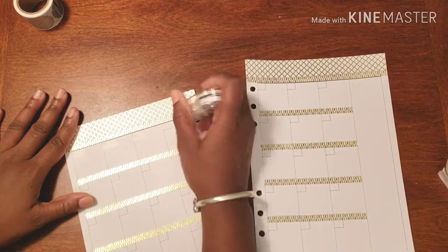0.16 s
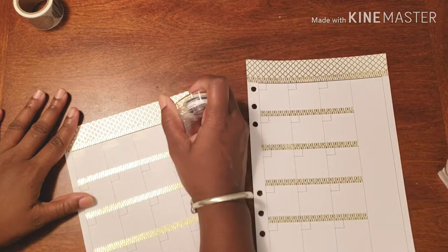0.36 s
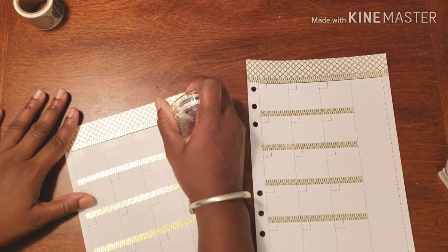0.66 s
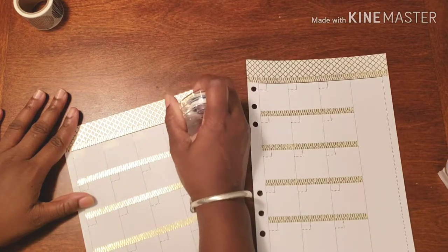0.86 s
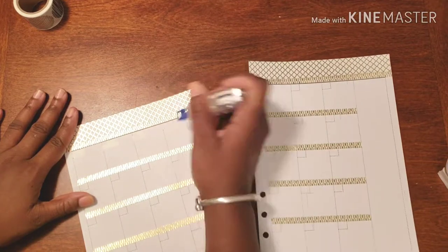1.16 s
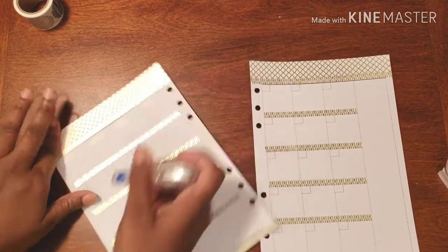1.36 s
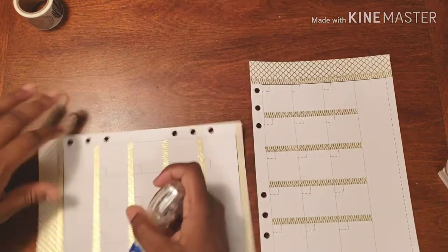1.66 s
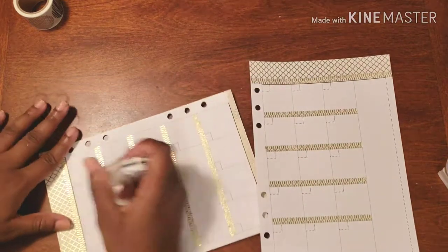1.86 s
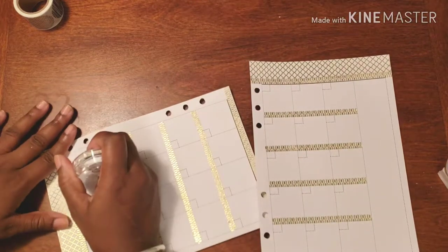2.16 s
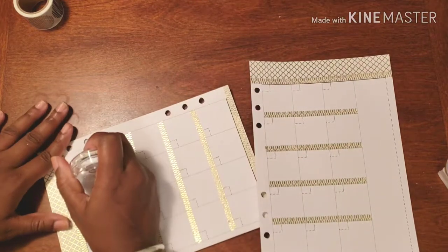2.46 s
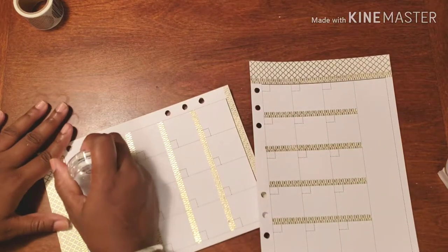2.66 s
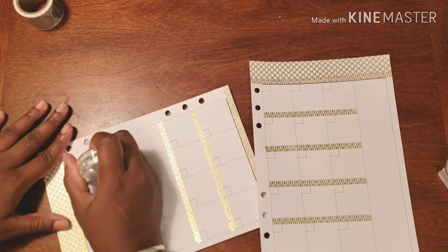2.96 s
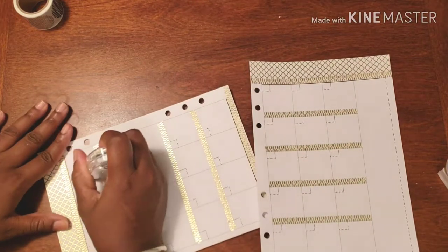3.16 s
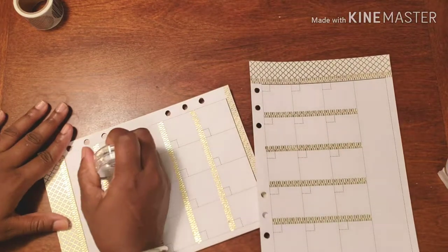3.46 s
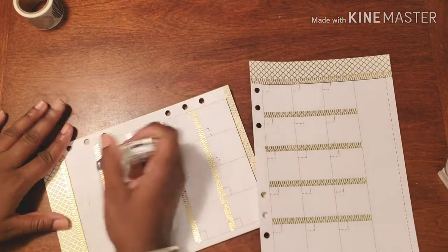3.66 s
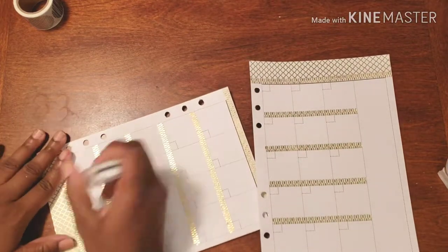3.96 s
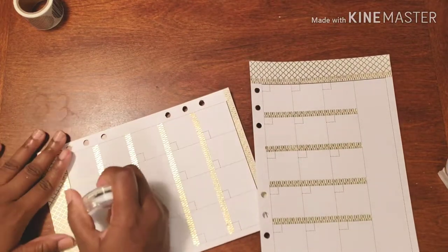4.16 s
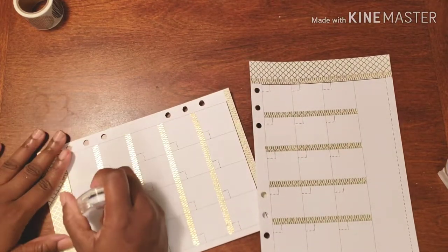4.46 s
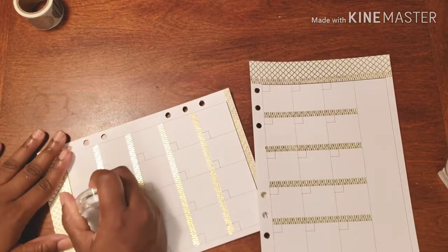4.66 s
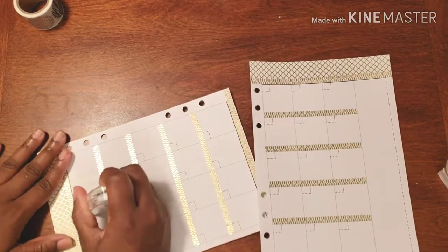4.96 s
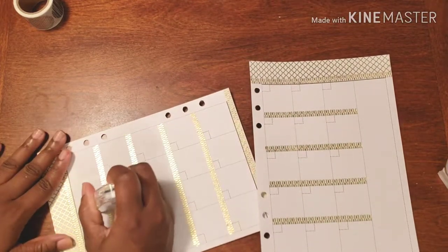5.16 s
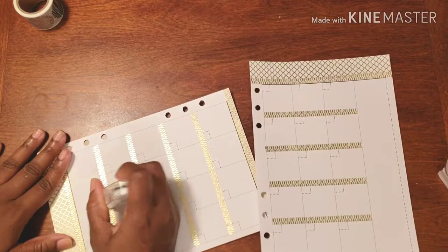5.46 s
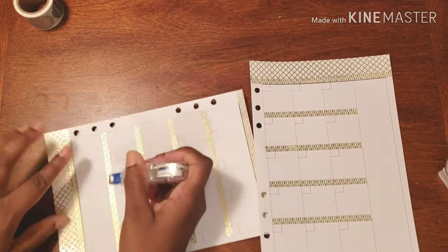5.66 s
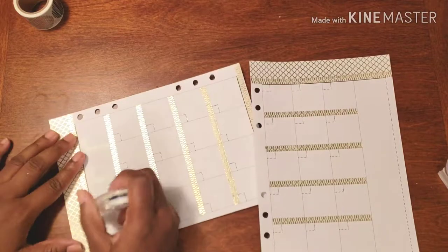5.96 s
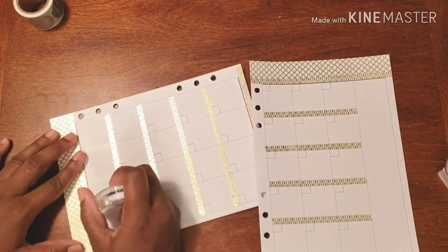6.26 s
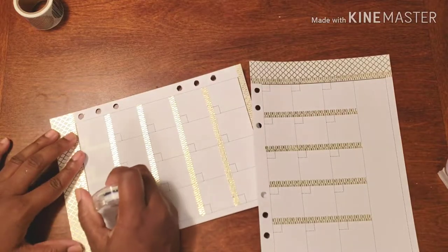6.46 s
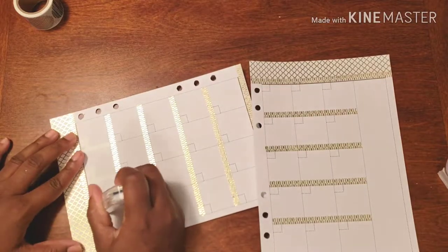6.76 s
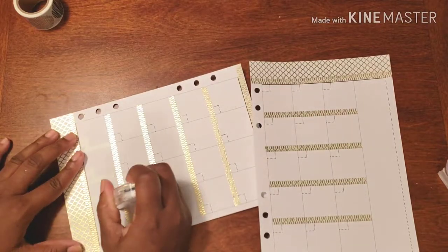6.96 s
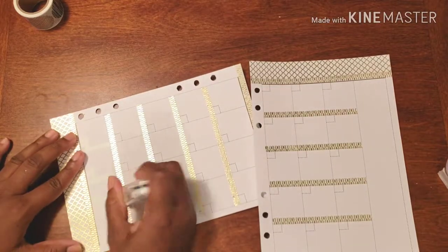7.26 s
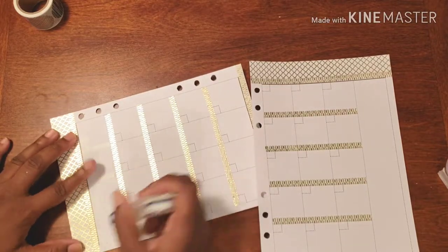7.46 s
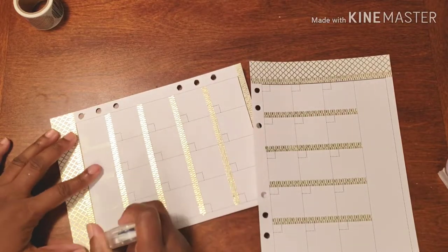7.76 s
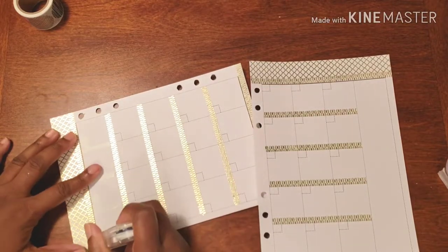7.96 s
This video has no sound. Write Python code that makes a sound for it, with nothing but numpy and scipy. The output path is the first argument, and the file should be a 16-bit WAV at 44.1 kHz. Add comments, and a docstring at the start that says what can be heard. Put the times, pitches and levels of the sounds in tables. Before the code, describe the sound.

A plastic roller ticks briefly, pauses, then ticks again; the page is turned with a swish, a slap and soft table thuds. A dense ratchet stroke follows, then more paper shuffling, two hollow knocks from across the room, a long clicking stroke, more handling, another knock, a last stroke and a final knock. Close stereo phone pickup, small indoor room, low hum and rumble.

```python
"""Ratchet ticks run in strokes over a page; paper and fingers slide between them, hands bump the table top,
something hollow is knocked across the small room, and a motor hums over the room's rumble.
A correction-tape roller's pawl snaps against its plastic case: short noise bursts coloured by case modes.
Rubbing is grainy coloured noise; the wooden body and the table are decaying modes; puffs are dull bursts.
Echoes are decaying noise, and a phone's two microphone ports pick everything up."""
import sys
import numpy as np
from scipy import signal
from scipy.fft import rfft, irfft, next_fast_len
from scipy.io import wavfile
from scipy.ndimage import uniform_filter1d

SR = 44100
rng = np.random.default_rng(int(sys.argv[2]) if len(sys.argv) > 2 else 0)


def dump(signal):
    """Clip the signal to [-1, 1] and save it as 16-bit WAV at the path in sys.argv[1]."""
    limited = np.clip(np.atleast_2d(signal).T, -1, 1)
    pcm = np.round(limited * 32767).astype(np.int16)
    wavfile.write(sys.argv[1], SR, pcm)


N = 358091
T = np.arange(N) / SR

# legs of the roller's strokes, along which the sound glides; each pair of columns is (from, to):
# (start, end [s], main case mode [Hz], its level [dB], low case mode [Hz], its level [dB],
#  upper over lower treble [dB], hiss of the peeling tape [dB])
STROKE_LEGS = [(0, .2, 7500, 7400, 2.5, 5, 2460, 1800, -27, -28, 3.5, 5.4, -60, -72),
               (0.79, 1.1, 7660, 6400, 0, 6, 2280, 2130, -12.5, -32, -2.5, 1.1, -60.5, -72),
               (2.832, 3.195, 6600, 6540, 3, 10.5, 3170, 3160, -9, -10, -1.2, 6, -60.5, -63.5),
               (3.205, 3.6, 8400, 7900, 7, 10.5, 1940, 2020, -17, -31, 4.5, 3, -62, -73),
               (4.775, 5.53, 8000, 6700, -1, 12, 2070, 1950, -12.5, -38, -2.5, 3.7, -60.5, -70),
               (6.707, 6.985, 7100, 7500, 2, 6.5, 1890, 2080, -19, -10.5, 1.2, 0.6, -59, -62),
               (6.995, 7.32, 7750, 7650, 5.5, 8.5, 2900, 2800, -5.5, -33, 1.5, 3.5, -64.5, -73)]
# knocks across the room: (time [s], level [dB], brightness [dB per octave], second overtone [dB],
#  direct share [dB], left minus right of the direct sound [dB])
FAR_KNOCKS = [(4.177, -41, -2.5, -0.5, -8, 13), (4.258, -34.5, -1.5, 1, -1, 11),
              (6.212, -34, -2.5, 4.5, -9, 11), (7.673, -29, 2, 4.5, -21, 24)]


def undb(db):
    """Gain of a level in dB."""
    return 10 ** (np.asarray(db) / 20)


def along_hz(table, hz):
    """Read a (frequency [Hz], value) table on a log-frequency axis."""
    f, v = np.transpose(table)
    return np.interp(np.log(np.maximum(hz, 1)), np.log(f), v)


def left_right(pan_db):
    """Levels in dB of the two channels for a left-minus-right difference."""
    return np.array([[pan_db], [-pan_db]]) / 2


def noise(n, gain):
    """Stereo noise of rms 1 with spectrum gain(hz), alike left and right in the bass as in a diffuse room."""
    # likeness of the channels: (frequency [Hz], left-right correlation)
    likeness = [(60, 0.96), (150, 0.99), (300, 0.8), (640, 0.061), (1400, -0.13), (3000, 0.0097)]
    m = next_fast_len(n)
    hz = np.arange(m // 2 + 1) * SR / m
    c = np.clip(along_hz(likeness, hz), -1, 1)
    mid, side = rfft(rng.standard_normal((2, m))) * gain(hz)
    common, difference = mid * np.sqrt(1 + c), side * np.sqrt(1 - c)
    x = irfft([common + difference, common - difference], m)[:, :n]
    return x / np.sqrt(np.mean(x ** 2))


def walk(rate):
    """Smooth random wander: values held 1 / rate s and slewed twice; spread about 0.7."""
    k = int(SR / rate)
    steps = np.repeat(rng.standard_normal(N // k + 1), k)
    return 0.99 * uniform_filter1d(uniform_filter1d(steps, k), k)[:N]


def add(out, s, x):
    """Mix a short sound in at time s."""
    i = int(s * SR)
    out[..., i:i + x.shape[-1]] += x[..., :N - i]


def ring(hz, db, t60, phase, seconds):
    """Sum of decaying modes (last axis of the arguments), one sound per leading row."""
    t = np.arange(int(seconds * SR)) / SR
    hz, db, t60, phase = (np.asarray(v)[..., None] for v in (hz, db, t60, phase))
    decay = undb(db - 60 * t / t60)
    return np.sum(decay * np.sin(2 * np.pi * hz * t + phase), axis=-2)


def room(x, late_db, early_db, early_t60, rise):
    """Close reflections from table and hands, then the walls' tail, which dies faster in the treble."""
    # decay of the walls' tail: (frequency [Hz], t60 [s])
    wall_decay = [(150, 0.38), (1000, 0.46), (4000, 0.39), (8000, 0.29), (15000, 0.29)]
    t = np.arange(int(.6 * SR)) / SR
    lumps = 1.4 * walk(613)[:len(t)]  # single near surfaces stand out as separate echoes
    echo = undb(early_db + lumps - 60 * t / early_t60) * noise(len(t), np.ones_like)
    for hz in 125 * 2. ** np.arange(8):
        octave = lambda f: np.cos(np.clip(np.log2(f / hz + 1e-9), -1, 1) * np.pi / 2)
        share = np.sqrt(min(hz / 16000, .55))
        decay = undb(late_db - 60 * t / along_hz(wall_decay, hz))
        echo += share * decay * noise(len(t), octave)
    build_up = 1 - np.exp(-(t / rise) ** 2)
    return signal.fftconvolve(x[None], echo * build_up, axes=1)[:, :N]


def resonance(hz, width_hz, db):
    """Power response of a mode on the bursts' frequency grid; arguments may hold one value per event."""
    f = np.arange(1, 514) * SR / 1024  # the grid sits one bin up, avoiding 0 Hz
    hz, db = np.reshape(hz, (-1, 1)), np.reshape(db, (-1, 1))
    return undb(2 * db) / (1 + (f / width_hz - hz ** 2 / f / width_hz) ** 2)


def bursts(events, power, length_s, **space):
    """Short noise jolts (s, dB, left minus right dB), each coloured by a power spectrum, near and in the room."""
    t = np.arange(1024) / SR
    jolt = rng.standard_normal((len(events), 2, len(t))) * t ** 2 * np.exp(-t / length_s)
    # folding the cepstrum makes the colouring ring only after the jolt
    fold = np.r_[.5, np.ones(512), np.zeros(511)]
    colour = np.exp(rfft(irfft(np.log(power)) * fold))
    near_bursts = irfft(rfft(jolt) * colour[:, None])
    loudest = uniform_filter1d(near_bursts ** 2, size=40).max(axis=-1, keepdims=True)
    near_bursts /= np.sqrt(2 * loudest)
    # summed over all directions, the room hears the even colour of the body
    spread = irfft(colour)
    energy_ratio = np.mean(near_bursts ** 2, axis=(1, 2)) / np.mean(spread ** 2, axis=1)
    spread *= np.sqrt(energy_ratio)[:, None]
    near, far = np.zeros((2, N)), np.zeros(N)
    for (s, db, pan_db), burst, even in zip(events, near_bursts, spread):
        add(near, s - 2 * length_s, burst * undb(db + left_right(pan_db)))  # the jolt peaks at s
        add(far, s, (even + 0.9 * burst[1]) * undb(db - 1.0))
    return near + room(far, **space)


def rumble():
    """The room's wandering low noise, with the microphone's steady white hiss."""
    # colour of the rumble: (frequency [Hz], relative level [dB per Hz])
    rumble_colour = [(12, -14.5), (22, -19.5), (52, -7), (80, -10.5), (98, -14.5), (112, -23.5),
                     (138, -10.5), (172, -9.5), (248, -13.5), (285, -21), (446, -23), (680, -31),
                     (860, -30), (1050, -39), (2200, -52.5)]
    level_db = -56.5 + 1.73 * walk(3.2)
    low = undb(level_db) * noise(N, lambda f: undb(along_hz(rumble_colour, f)) * (f < 3000))
    return low + undb(-75) * rng.standard_normal((2, N))


def motor_hum():
    """Motor lines that waver in size and drift a little in phase, the right channel slightly ahead."""
    # motor lines: (frequency [Hz], rms level [dB], scale of the wavering [dB])
    motor_lines = [(78.5, -64, 1), (121, -57.5, 1.94), (174.3, -68, 3), (735, -75.5, 3)]
    out = np.zeros((2, N))
    for hz, db, waver_db in motor_lines:
        drift = 1.16 * walk(1.5)
        line = np.sin(2 * np.pi * hz * T + drift + np.array([[0], [hz / 900]]))
        out += np.sqrt(2) * undb(db + waver_db * walk(rate=12)) * line
    return out


def ratchet():
    """Each tooth snaps the pawl against the case, whose broad modes colour the tick."""
    # pawl ticks: (time [s], level [dB])
    pawl_ticks = [(0.0068, -29.5), (0.0186, -34), (0.0666, -28.5), (0.0754, -36), (0.1123, -30.5),
                  (0.123, -35), (0.191, -32), (0.776, -46.5), (0.804, -32.5), (0.8185, -33.5),
                  (0.835, -32.5), (0.869, -33), (0.902, -33), (0.931, -34), (0.9383, -39), (0.9609, -33),
                  (1.0024, -38.5), (1.0663, -36.5), (1.081, -40), (1.1074, -34), (2.8293, -46.5),
                  (2.8447, -35.5), (2.8675, -32), (2.8834, -35.5), (2.8933, -32.5), (2.9132, -33.5),
                  (2.927, -33), (2.9512, -33), (2.9642, -30.5), (2.9897, -34), (2.9998, -32.5),
                  (3.0212, -31), (3.0326, -32.5), (3.0514, -32.5), (3.062, -32.5), (3.087, -31.5),
                  (3.098, -30), (3.1188, -33), (3.1278, -34), (3.1525, -28), (3.1578, -39), (3.1846, -28.5),
                  (3.2227, -29), (3.264, -28.5), (3.3095, -30.5), (3.3208, -39), (3.4086, -31),
                  (3.456, -30), (3.5697, -33.5), (3.591, -46), (4.7754, -37.5), (4.8009, -33),
                  (4.833, -32.5), (4.897, -33.5), (4.92, -31.5), (4.9445, -32), (4.981, -33), (4.994, -38),
                  (5.0143, -31.5), (5.029, -37), (5.0417, -31), (5.0675, -32), (5.094, -41), (5.12, -30.5),
                  (5.148, -41), (5.1664, -30), (5.2022, -38), (5.214, -29.5), (5.237, -38), (5.252, -29),
                  (5.291, -42), (5.3114, -28), (5.342, -32), (5.3546, -34), (5.3834, -36.5), (5.3973, -29),
                  (5.5263, -36), (6.6982, -37), (6.715, -32.5), (6.7195, -32), (6.7302, -30),
                  (6.7453, -30.5), (6.75, -41), (6.7648, -30), (6.7882, -31), (6.8114, -30.5), (6.834, -29),
                  (6.8606, -32), (6.8848, -31), (6.9123, -32.5), (6.9366, -31.5), (6.967, -34.5),
                  (6.9769, -36), (7.0033, -31.5), (7.017, -34.5), (7.05, -33.5), (7.0716, -40),
                  (7.1406, -32.5), (7.1875, -37), (7.2184, -31.5), (7.303, -38), (7.3179, -32.5)]
    # plastic case modes: (frequency [Hz], width [Hz], level before the treble balance [dB])
    case_modes = [(4200, 960, 0), (5500, 2000, -2.5), (6550, 610, 0.5), (7870, 530, -3.5), (10200, 880, -8),
                  (11140, 1230, 0), (13070, 920, -2), (13100, 1400, -8), (14800, 630, -4.5)]
    firm_tick_db, left_per_db = -33.5, 0.47  # lighter ticks lie further left
    bright_spread_db, pan_spread_db = 5, 1.5  # chance from tick to tick
    s, tick_db = np.transpose(pawl_ticks)
    ends = np.reshape(STROKE_LEGS, (len(STROKE_LEGS), -1, 2))
    when, *glides = np.moveaxis(ends, 1, 0).reshape(ends.shape[1], -1)
    main_hz, main_db, low_hz, low_db, tilt_db, _ = (np.interp(s, when, c) for c in glides)
    chance = rng.standard_normal((len(s), 2)).T
    bright_db = tilt_db + bright_spread_db * chance[0]
    pan_db = left_per_db * (firm_tick_db - tick_db) + pan_spread_db * chance[1]
    case = 0
    for hz, width_hz, db in case_modes:
        tilt = np.tanh(2 * np.log2(hz / 9000)) / 2
        case = case + resonance(hz, width_hz, db + bright_db * tilt)
    case = case + resonance(main_hz, 800, main_db - bright_db / 2)
    # so small a body radiates little below its first mode
    case = case * (1 - resonance(1, 3200, 0)) ** 5
    case = case + resonance(low_hz, 280, low_db) * resonance(low_hz, 550, 0)
    # the moving hand changes the echoes from tick to tick: three sets take turns
    rows, turn = np.transpose([s, tick_db, pan_db]), np.arange(len(s)) % 3
    space = dict(late_db=-37.5, early_db=-22.5, early_t60=0.04, rise=0.0016)
    return sum(bursts(rows[turn == k], case[turn == k], length_s=0.00044, **space) for k in np.unique(turn))


def peel_power():
    """Power of hiss, swish and scrape as the tape peels and rubs through each stroke."""
    swish_db, scrape_db, onset_s = -11, -17.5, 0.02  # levels over the peeling hiss; fade at stroke ends
    leg_s, peel_db = np.transpose([(row[k], row[k - 2]) for row in STROKE_LEGS for k in range(2)])
    on = sum((T >= row[0]) & (T < row[1]) for row in STROKE_LEGS)
    on = uniform_filter1d(np.minimum(on, 1.), int(onset_s * SR)).clip(0)
    balance = undb(2 * np.r_[0, swish_db, scrape_db])[:, None]
    return balance * on * undb(2 * np.interp(T, leg_s, peel_db))


def friction(grain_db=2.85, flicker_db=3.0):
    """Fibres catch in dense tiny jerks: a hiss, the sheet's duller swish and a low scrape through the table."""
    # colour of the paper hiss: (frequency [Hz], relative level [dB per Hz])
    paper_colour = [(2820, -10.5), (4800, 7), (7480, 7.5), (8700, 3.5), (14500, 5.5), (15600, -8),
                    (16000, -23)]
    jerks = uniform_filter1d(rng.exponential(size=N) - 1, size=12)
    grains = undb(grain_db * jerks + flicker_db * walk(50))
    hiss = lambda f: undb(along_hz(paper_colour, f))
    swish = lambda f: 1 / (1 + ((f - 3800) / 800) ** 2) / (1 + (3000 / (f + 1)) ** 8)
    scrape = lambda f: 1 / (1 + ((f - 1700) / 500) ** 2)
    out = np.zeros((2, N))
    for colour, power in zip((hiss, swish, scrape), peel_power() + slide_power()):
        out += grains * noise(N, colour) * np.sqrt(power)
    return out


def slaps():
    """The page or a palm slaps flat on the table and squeezes air out: a dull wide puff."""
    # flat slaps: (time [s], level [dB], centre [Hz], upper edge [dB], left minus right [dB])
    flat_slaps = [(.199, -55, 610, -22, -8), (1.302, -56, 350, -16, 7), (1.484, -38, 434, -9.5, 6),
                  (2.085, -58.5, 704, -14, 13), (3.687, -57.5, 505, -5, 3), (5.581, -55.5, 452, -12, 6),
                  (7.36, -52, 496, -9, 4)]
    s, slap_db, hz, edge_db, pan_db = np.transpose(flat_slaps)
    puff = resonance(hz, 660, 0) * resonance(hz, 650, 0) ** 2
    puff = puff + resonance(900, 470, edge_db) * resonance(880, 610, 0)
    space = dict(late_db=-29.0, early_db=-19, early_t60=0.14, rise=0.0011)
    return bursts(np.transpose([s, slap_db, pan_db]), puff, length_s=0.0009, **space)


def slide_power():
    """Power of hiss, swish and scrape as paper and skin slide: each slide swells and fades."""
    # slides: (loudest time [s], length [s], hiss [dB], swish [dB], scrape [dB])
    slide_moves = [(1.223, 0.45, -66.5, -77, -81), (1.305, 0.19, -71, -73, -69),
                   (1.396, 0.16, -55, -60, -71), (1.473, 0.099, -47.5, -54, -83),
                   (1.537, 0.35, -51.5, -61, -89), (1.615, .06, -67, -58, -88),
                   (1.73, 0.22, -59.5, -76, -95), (1.785, 0.11, -63, -64, -67),
                   (1.897, 0.16, -62.5, -62.5, -88), (2.08, 0.34, -70, -73.5, -95),
                   (2.196, 0.28, -93, -81, -98), (3.647, 0.19, -64, -78, -87),
                   (3.738, 0.052, -58.5, -66, -74), (3.79, .15, -66, -68, -85),
                   (3.838, 0.11, -64, -69, -89), (3.945, 0.11, -58.5, -68, -73), (5.577, .2, -66, -95, -90),
                   (5.693, 0.14, -53.5, -57, -84), (5.818, 0.23, -60, -76, -92),
                   (5.891, 0.13, -59, -62, -90), (6.083, 0.22, -90, -76, -95),
                   (7.365, 0.17, -70, -72, -74.5), (7.445, 0.17, -70.5, -79, -76.5),
                   (7.57, 0.1, -78, -80, -94)]
    rise_share, edge_db = 0.41, -15  # part of the length spent swelling; level at both ends
    power = np.zeros((3, N))
    for s, length, *db in slide_moves:
        away = np.maximum((s - T) / rise_share, (T - s) / (1 - rise_share)) / length
        power += undb(2 * np.array(db))[:, None] * undb(2 * edge_db * away)
    return power


def snaps():
    """The page creases or a fingertip lifts: a pop with one main ring over a thin wide crack."""
    # snaps: (time [s], level [dB], main ring [Hz], left minus right [dB])
    page_snaps = [(1.2461, -51, 5700, -1), (1.4097, -46, 6100, -3), (1.469, -35.5, 4520, 14),
                  (1.774, -54, 4870, 0), (1.8107, -59, 3720, -4), (3.6464, -55, 12300, 0),
                  (3.7348, -44.5, 7300, 9), (3.8276, -50.5, 4300, -3), (3.916, -53, 4800, 3.0),
                  (3.9725, -51.5, 4050, -2), (5.6221, -43, 8140, 3.0), (5.6805, -44.5, 4500, -2),
                  (5.7111, -44, 3320, 5), (5.8188, -36, 4970, -1), (7.4634, -51.5, 11000, 7)]
    s, snap_db, hz, pan_db = np.transpose(page_snaps)
    sheet = resonance(hz, 640, 0) * resonance(hz, 1400, 0) + resonance(8600, 6600, -19.5)
    space = dict(late_db=-38.5, early_db=-31, early_t60=0.023, rise=0.0013)
    return bursts(np.transpose([s, snap_db, pan_db]), sheet, length_s=0.00028, **space)


def bumps():
    """Hands push softly (half-sine force) into the table's modes: the longer the contact, the duller."""
    # hands leaning on the table: (time [s], peak level [dB], contact [ms])
    hand_bumps = [(1.3, -44.5, 3.2), (1.49, -41.5, 3.2), (1.765, -37.5, 3.7), (1.821, -44, 5.6),
                  (3.698, -58, 1.8), (3.919, -36.5, 4.6), (3.975, -42.5, 3.45), (4.035, -55, 3.3),
                  (5.877, -45.5, 9.8), (7.561, -42, 3.4), (7.67, -41, 2.6)]
    # table top modes: (frequency [Hz], level before a chance change [dB], t60 [s])
    table_modes = [(73, -4.5, 0.9), (139.9, 1, 0.69), (193, 2, 0.099), (245.6, -9, 0.69),
                   (377.6, 5.5, 0.15)]
    hz, db, t60 = np.transpose(table_modes)
    direct = np.zeros(N)
    for s, bump_db, ms in hand_bumps:
        chance_db = rng.standard_normal(len(hz))
        push = np.sin(np.pi * np.linspace(0, 1, max(int(ms * SR / 1000), 3)))
        thud = signal.fftconvolve(ring(hz, db + chance_db, t60, 0 * hz, 0.5), push)
        add(direct, s, thud * undb(bump_db) / np.abs(thud).max())
    return direct + room(direct, late_db=-33.5, early_db=-51, early_t60=0.064, rise=0.0013)


def squeak():
    """A fingertip squeaks faintly on the sheet: narrow noise that swells and fades."""
    # the squeak: (start [s], length [s], centre [Hz], level [dB])
    fingertip_squeak = (2.0, 0.4, 3400, -81)
    start, length, hz, squeak_db = fingertip_squeak
    swell = np.sin(np.pi * np.clip((T - start) / length, 0, 1))
    return undb(squeak_db) * swell * noise(N, lambda f: 1 / (1 + ((f - hz) / 70) ** 2))


def knocks():
    """A hard blow rings a hollow wooden body; reflections build up over some ms behind the first arrival."""
    # hollow wooden body's modes: (frequency [Hz], level relative to the blow [dB], t60 [s])
    hollow_modes = [(246.7, 8, 0.16), (812, -36, 0.17), (848, -7.5, 0.11), (989, 4, 0.044),
                    (1096, -7.5, 0.064), (1220, -7.5, 0.06), (1286, -4, 0.029), (1825, -11.5, 0.062),
                    (1875, -8.5, 0.07), (2016, -8, 0.034), (1960, -24, 0.023), (2636, -7.5, 0.024),
                    (2750, -5.5, 0.031), (3277, -10.5, 0.019), (3470, 3, 0.0097), (4000, -9, 0.029),
                    (4280, -12, 0.038), (4500, -15, 0.015), (5300, -32, 0.0062), (6700, -5, 0.0038),
                    (7300, -21, .004)]
    contact_s = 0.00017  # the blow takes about this long to set the body ringing
    hz, db, t60 = np.transpose(hollow_modes)
    octaves_up = np.log2(np.maximum(hz / 1000, 1))
    is_second = abs(np.log2(hz / 1900)) < .25
    out, far = np.zeros((2, N)), np.zeros(N)
    radiate = signal.butter(2, 700, "high", fs=SR, output="sos")  # a small body sends out little bass
    # the blow rattles, spreading the first arrival over some ms
    t = np.arange(600) / SR
    scatter = rng.standard_normal((2, len(t))) * t * np.exp(-t / 0.0016)
    scatter /= np.sqrt(np.sum(scatter ** 2, axis=1, keepdims=True))
    for s, blow_db, bright_db, second_db, direct_db, pan_db in FAR_KNOCKS:
        mode_db = blow_db + db + bright_db * octaves_up + second_db * is_second
        body = signal.sosfilt(radiate, ring(hz, mode_db, t60, 0 * hz, .2))
        body = body * (1 - np.exp(-T[:len(body)] / contact_s))
        add(far, s, body)
        first_arrival = signal.fftconvolve(body[None], scatter, axes=1)
        add(out, s, first_arrival * undb(direct_db + left_right(pan_db)))
    return out + room(far, late_db=-32.0, early_db=-27, early_t60=0.21, rise=0.0019)


def thumps():
    """Each knock across the room also sends a dull low puff."""
    thump_hz, thump_db = 320, -14.5  # level over the blow
    s, blow_db, *_ = np.transpose(FAR_KNOCKS)
    puff = resonance(thump_hz + 0 * s, 200, 0) ** 2
    space = dict(late_db=-41.5, early_db=-21, early_t60=0.079, rise=0.0025)
    return bursts(np.transpose([s, blow_db + thump_db, 0 * s]), puff, length_s=0.00155, **space)


def scene():
    """Everything that reaches the two microphone ports, with the microphone's own hiss."""
    background = rumble() + motor_hum()
    page = ratchet() + friction() + slaps() + snaps() + bumps() + squeak()
    return background + page + knocks() + thumps()


def record(dry):
    """The two ports differ a little in level along the spectrum; the phone cuts the top."""
    # balance of the ports: (frequency [Hz], left minus right [dB])
    port_balance = [(250, 0.64), (600, -1.5), (1200, -0.6), (4000, 1.5), (8000, 0.5), (13000, 2)]
    top_hz = 15750
    m = next_fast_len(N)
    lean = along_hz(port_balance, np.arange(m // 2 + 1) * SR / m) * np.array([[.5], [-.5]])
    wet = irfft(rfft(dry, m) * undb(lean), m)[:, :N]
    return signal.sosfilt(signal.ellip(10, .2, 70, top_hz, fs=SR, output="sos"), wet)


dry = scene()
out = record(dry)
dump(out)
```